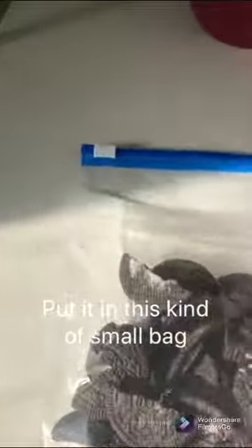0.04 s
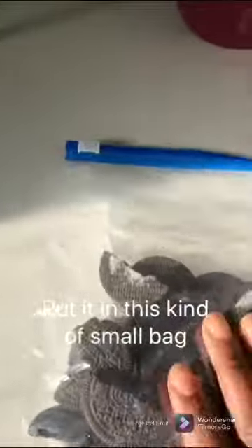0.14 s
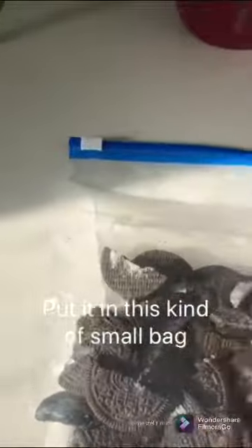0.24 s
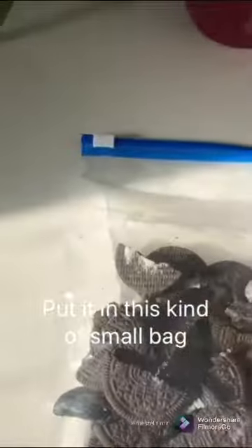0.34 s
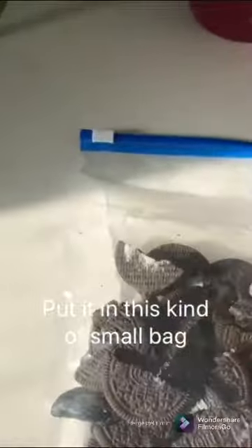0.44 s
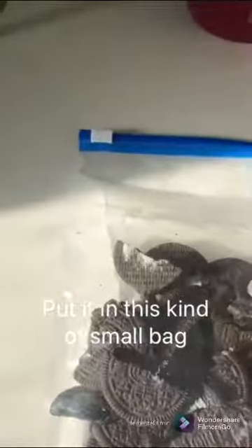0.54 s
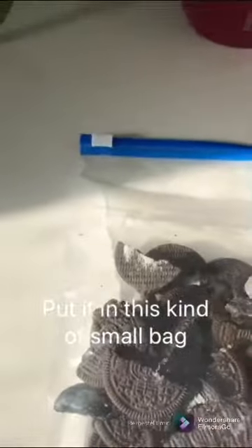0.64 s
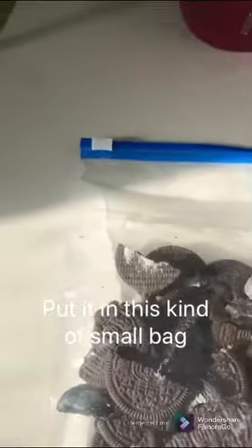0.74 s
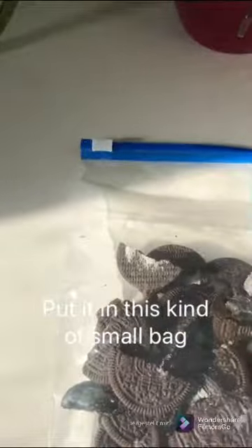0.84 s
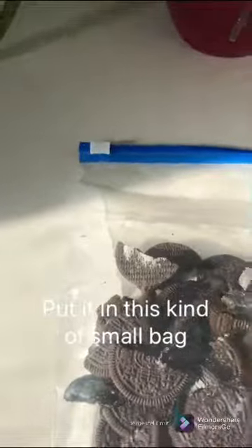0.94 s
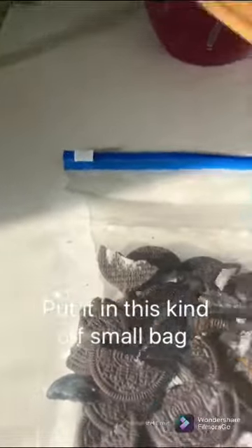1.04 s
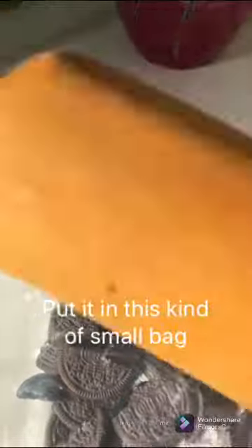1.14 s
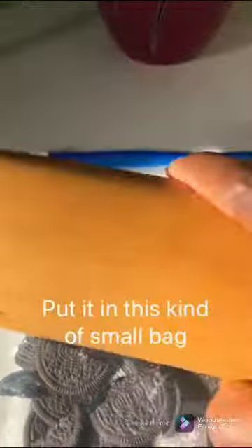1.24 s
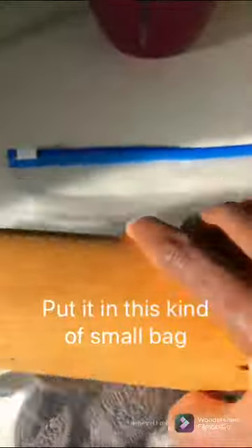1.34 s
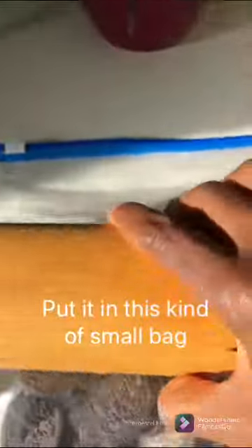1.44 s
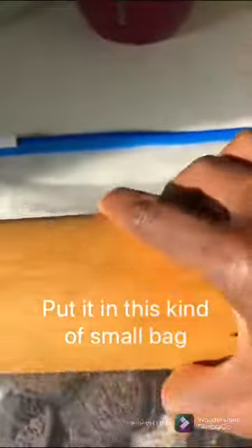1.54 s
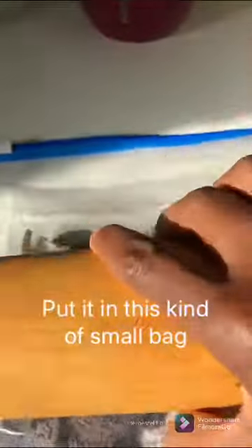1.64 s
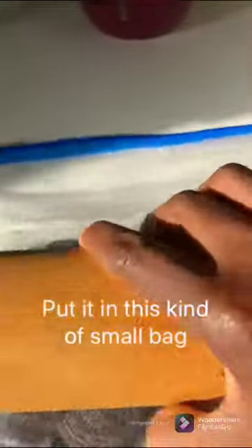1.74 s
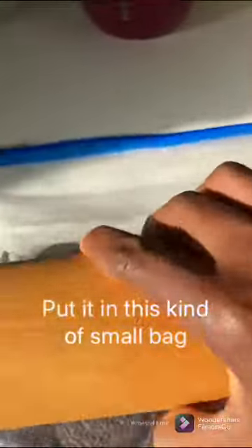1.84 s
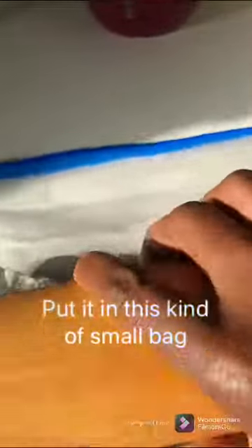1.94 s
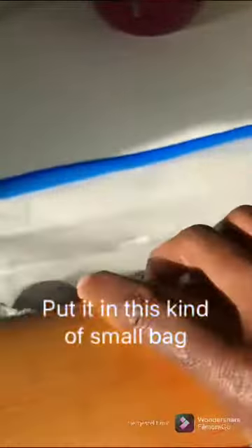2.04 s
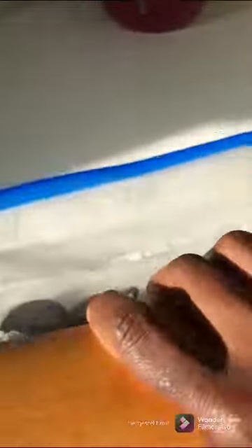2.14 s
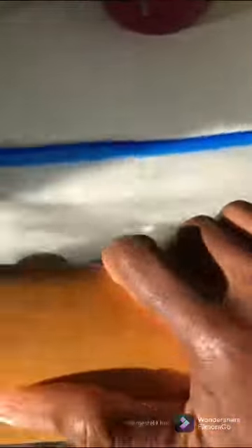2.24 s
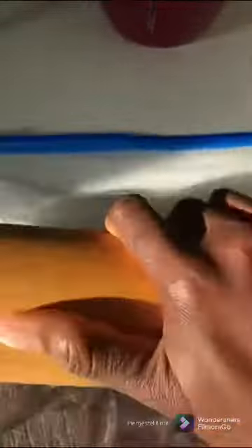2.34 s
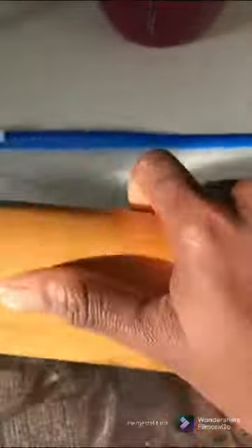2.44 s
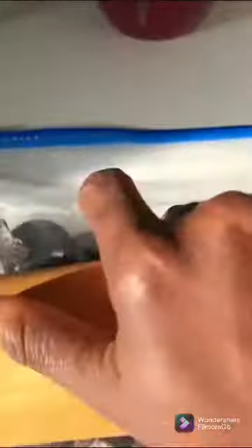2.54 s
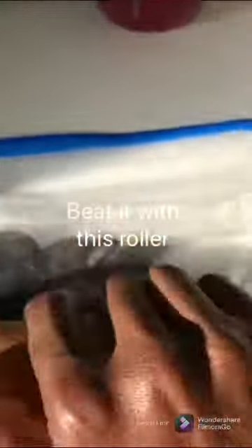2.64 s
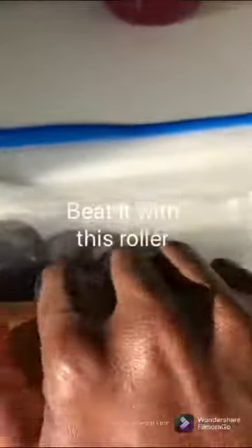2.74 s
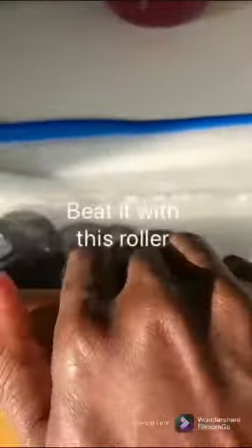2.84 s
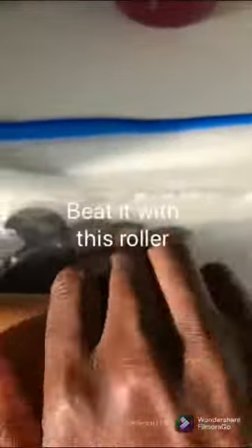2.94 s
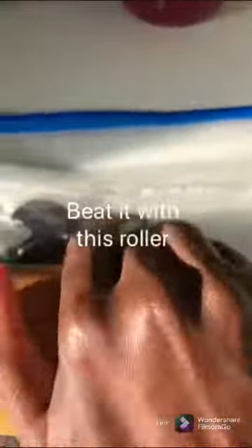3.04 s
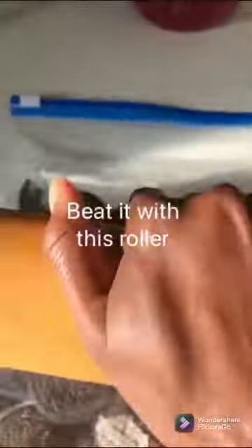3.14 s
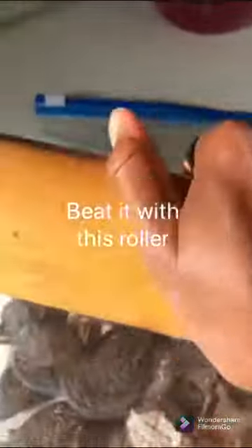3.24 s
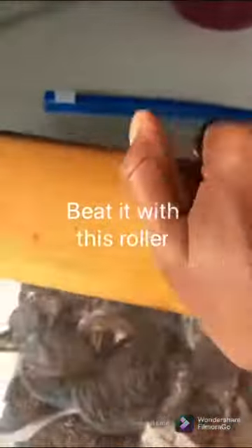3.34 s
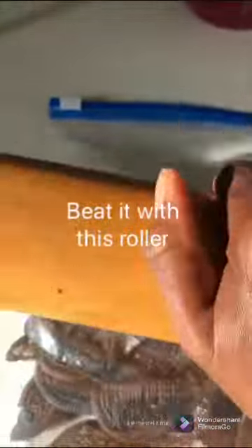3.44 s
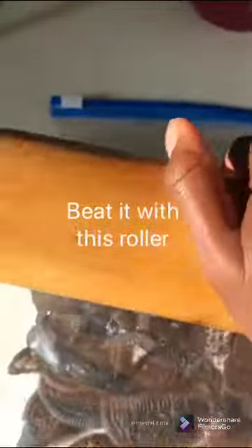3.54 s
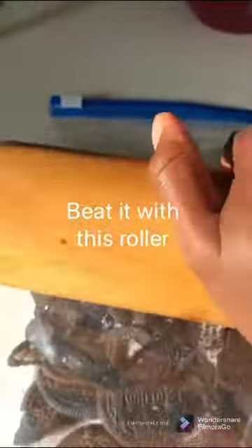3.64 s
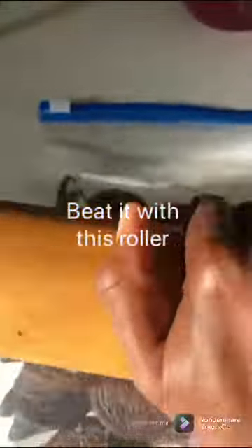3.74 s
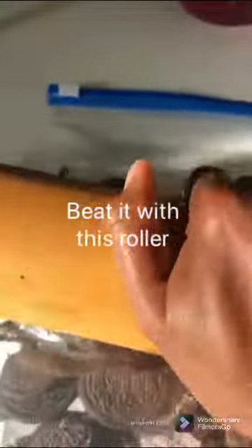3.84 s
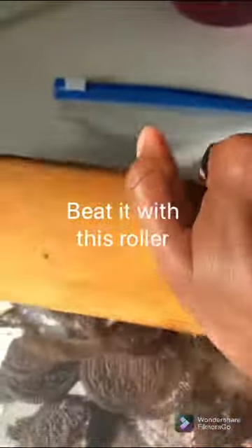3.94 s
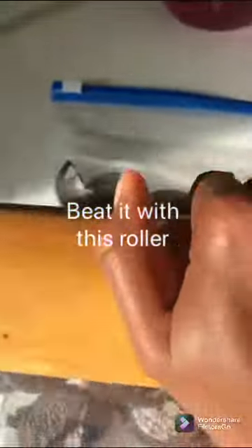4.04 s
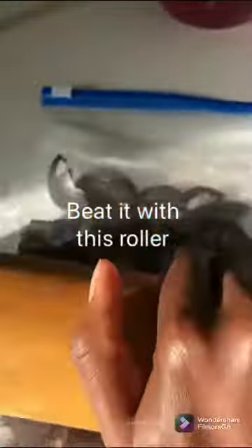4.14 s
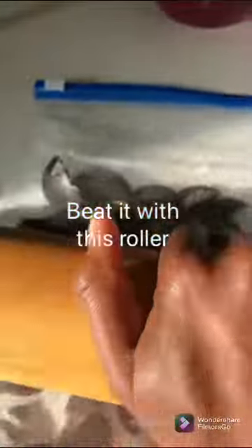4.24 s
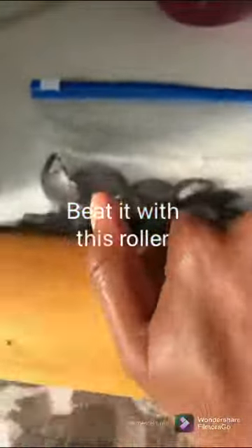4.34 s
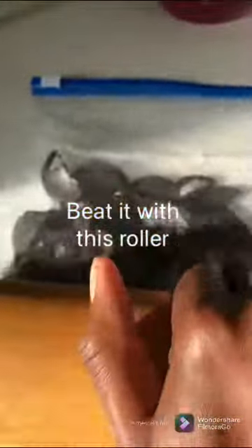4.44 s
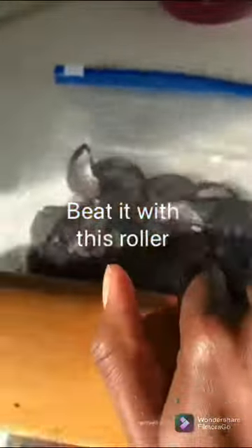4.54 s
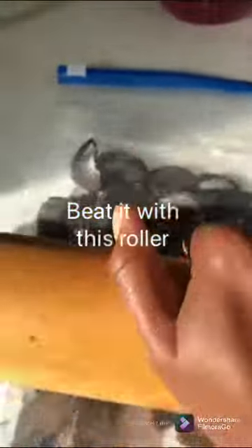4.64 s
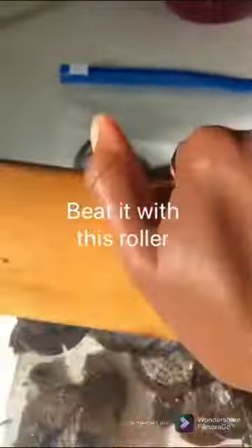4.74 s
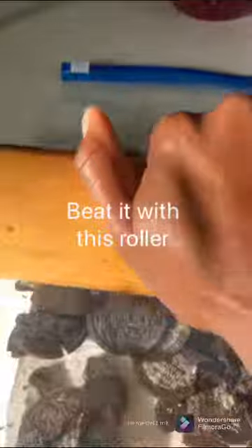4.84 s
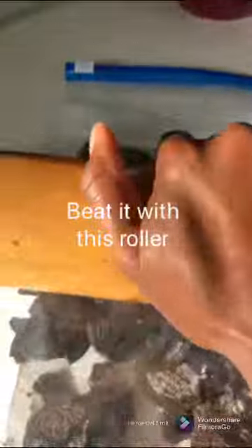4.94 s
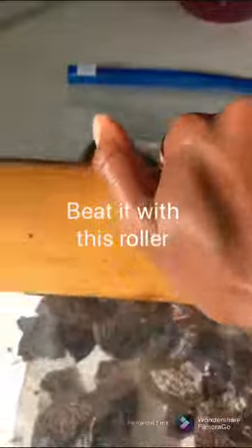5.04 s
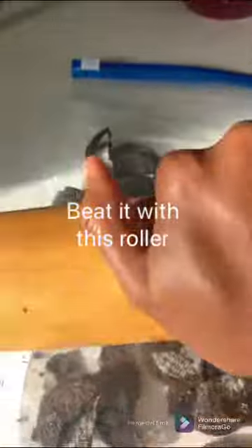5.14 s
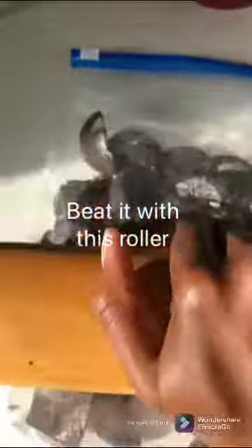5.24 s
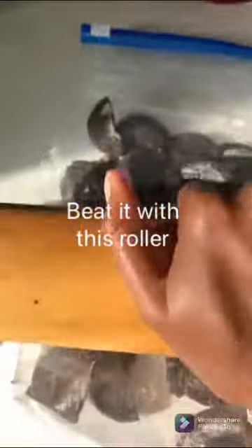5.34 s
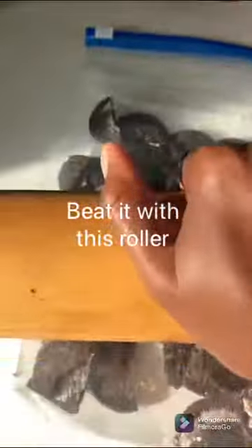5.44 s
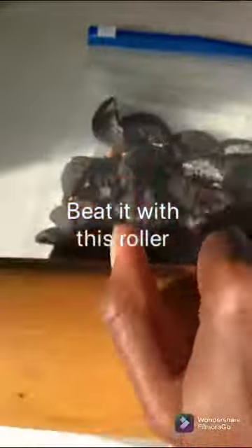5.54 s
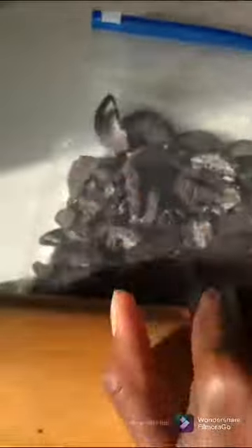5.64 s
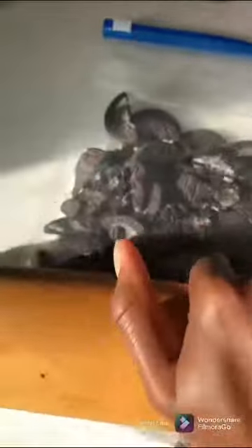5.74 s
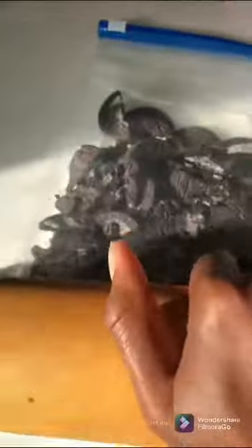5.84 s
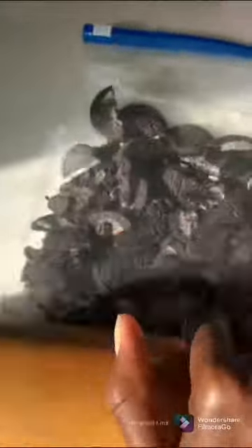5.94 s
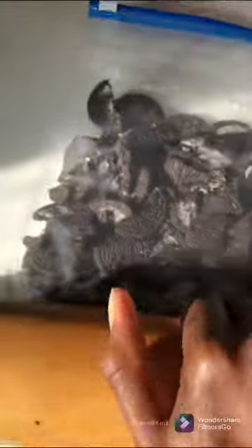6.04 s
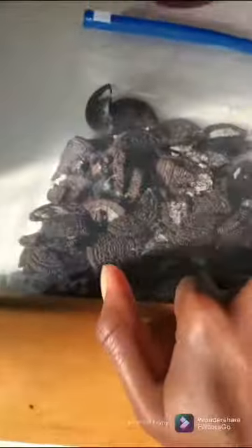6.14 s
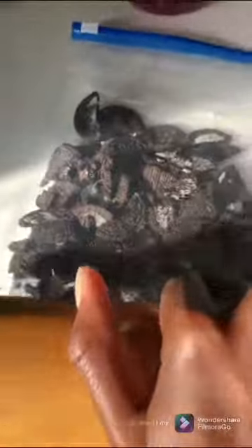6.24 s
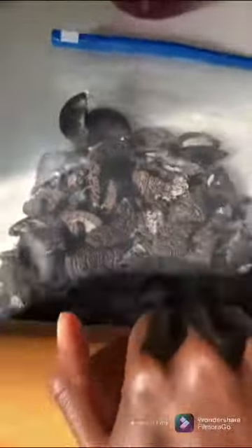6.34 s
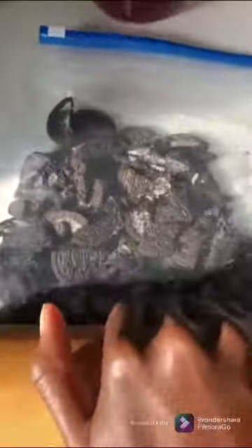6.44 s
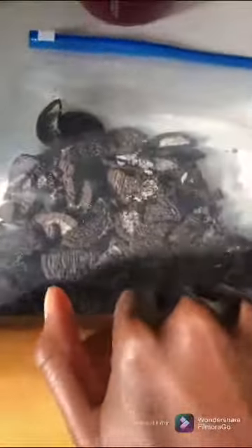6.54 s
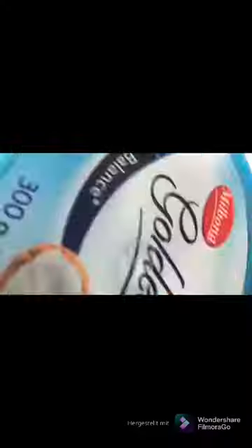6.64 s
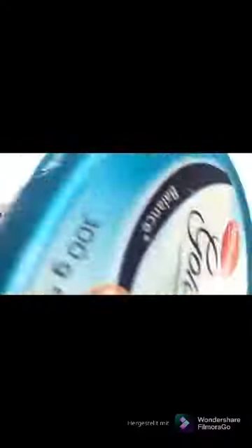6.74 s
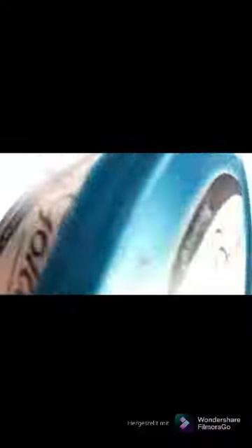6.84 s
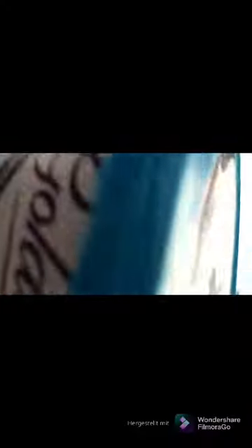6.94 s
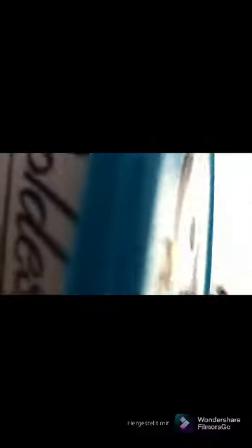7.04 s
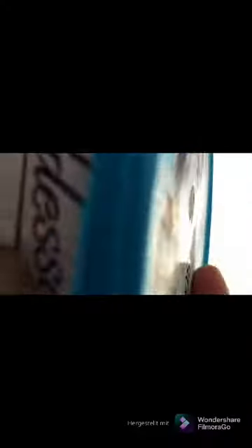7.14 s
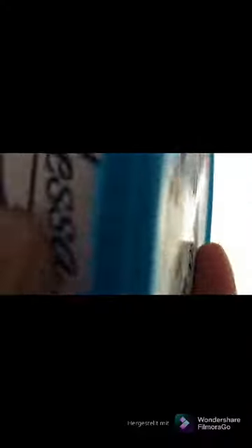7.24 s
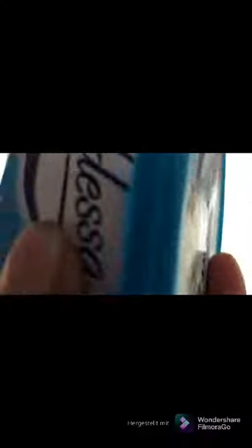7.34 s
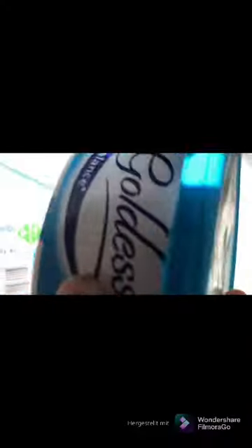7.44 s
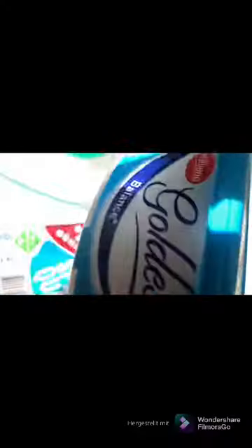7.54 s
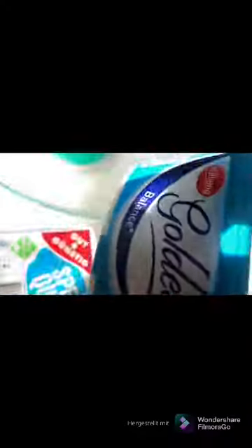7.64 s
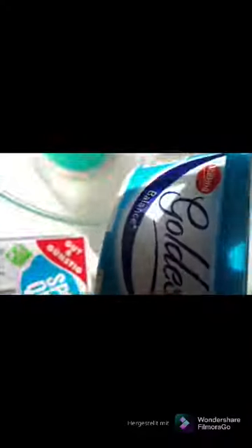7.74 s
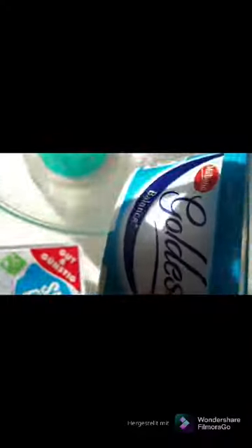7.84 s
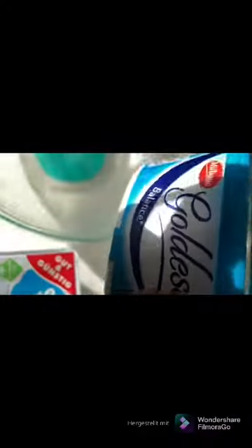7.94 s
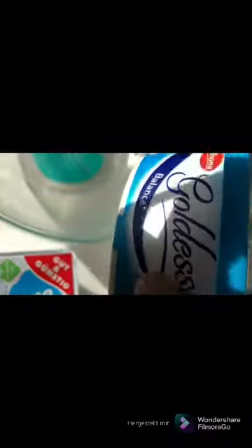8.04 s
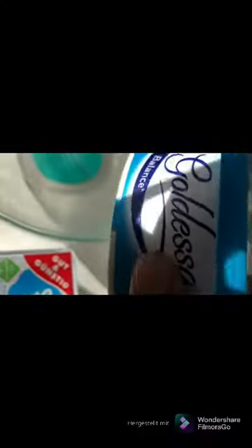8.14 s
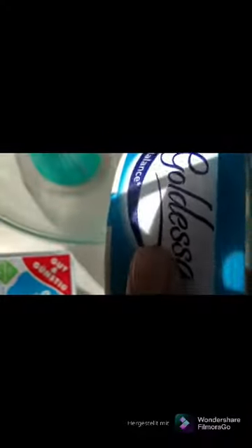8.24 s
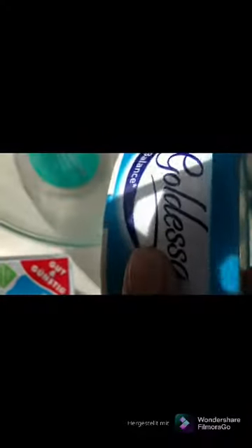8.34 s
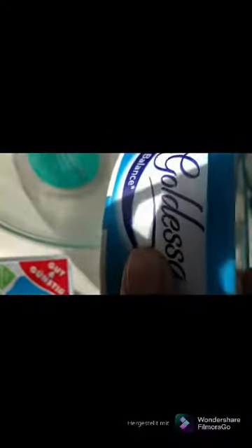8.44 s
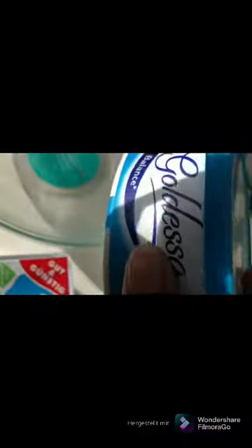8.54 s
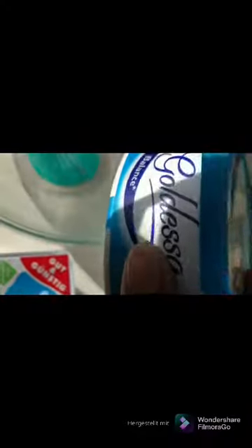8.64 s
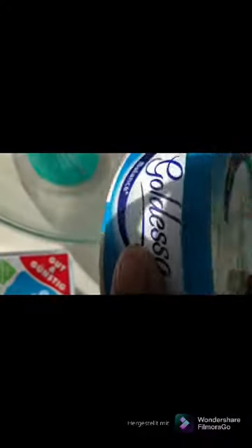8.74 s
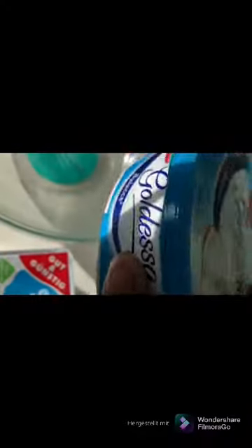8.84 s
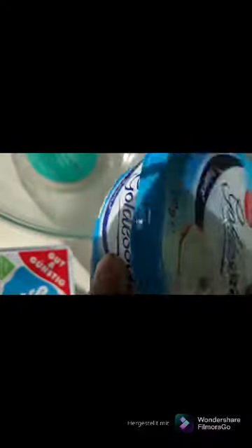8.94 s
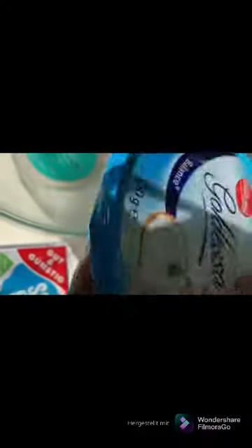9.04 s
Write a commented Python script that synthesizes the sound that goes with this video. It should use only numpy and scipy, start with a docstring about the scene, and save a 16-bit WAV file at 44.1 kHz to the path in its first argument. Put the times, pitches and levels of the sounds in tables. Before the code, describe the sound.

A rolling pin clacks, knocks and thumps on a worktop, crushing bagged biscuits; suddenly quiet, a brief swelling hiss and a light tub click.

```python
"""The tail of a crunch, then a biscuit snaps in a plastic bag; a wooden rolling pin leans on, rolls over and
beats the bag. Each blow snaps biscuits (bursts of tiny clicks), leaves crumbs and film crackling, and booms
in the worktop. The pin knocks on the hard top and clacks in the hand: short taps on decaying sine modes.
Then the scene suddenly changes: a short, gently swelling hiss of shaped noise, and a plastic tub
tapped and brushed by fingers in a quiet room."""
import sys
import numpy as np
from scipy import signal
from scipy.fft import rfft, irfft
from scipy.io import wavfile
from scipy.ndimage import uniform_filter1d

SR = 44100
rng = np.random.default_rng(int(sys.argv[2]) if len(sys.argv) > 2 else 0)


def transcribe(signal):
    """Save signal, clipped to [-1, 1], as a 16-bit WAV file at the path in sys.argv[1]."""
    frames = np.atleast_2d(signal).T
    limited = np.clip(frames, -1, 1)
    pcm = np.round(limited * 32767).astype(np.int16)
    wavfile.write(sys.argv[1], SR, pcm)


N = 400869
T = np.arange(N) / SR
CUT_S, HISS_START_S = 6.65, 6.697  # the crushing ends; the tub scene begins


def undb(db):
    """Turn decibels into gain."""
    return 10 ** (np.asarray(db) / 20)


def unit(x):
    """Scale to rms 1."""
    return x / np.sqrt(np.mean(x ** 2) + 1e-18)


def add(track, s, sound):
    """Mix a sound into the track at time s."""
    i = max(int(s * SR), 0)
    track[i:i + len(sound)] += sound[:N - i]


def between(start_s, end_s):
    """Give 1 from start to end and 0 elsewhere, with edges smoothed over 64 samples."""
    return uniform_filter1d(1. * ((T > start_s) & (T < end_s)), size=64)


def colour(x, points):
    """Filter to a (pitch_hz, level_db) outline, scaled to unit power, with no sound before its cause."""
    hz, db = np.transpose(points)
    grid = np.linspace(1, SR / 2, 2049)
    outline_db = np.interp(np.log(grid), np.log(hz), db)
    # folding the cepstrum makes the filter minimum-phase
    cepstrum = irfft(np.log(undb(outline_db)))
    fold = 1 + np.sign(len(cepstrum) / 2 - np.arange(len(cepstrum)))
    fold[0] = 1
    response = irfft(np.exp(rfft(cepstrum * fold)))
    return signal.oaconvolve(x, response / np.linalg.norm(response))[:len(x)]


def band(x, lo_hz, hi_hz, order=1):
    """Keep the sound between two pitches."""
    top_hz = min(hi_hz, .49 * SR)
    return signal.sosfilt(signal.butter(order, [lo_hz, top_hz], "band", fs=SR, output="sos"), x)


def ring(modes, detune=0.0083, vary_db=2):
    """Tap an object's modes, rms 1 over the first 10 ms; grip and striking point vary pitch and level."""
    t = T[:SR // 4]
    out = np.zeros(len(t))
    for hz, db, t60 in modes:
        level = undb(db + vary_db * rng.standard_normal() - 60 * t / t60)
        actual_hz = hz * (1 + detune * rng.standard_normal())
        out += level * np.sin(2 * np.pi * actual_hz * t) * rng.choice([-1, 1])
    return out / np.std(out[:SR // 100])


def crack(t60):
    """Make a short burst of contact noise that fades by 60 dB in t60 seconds."""
    t = T[:SR // 4]
    return rng.standard_normal(len(t)) * undb(-60 * t / t60)


def soften(x, contact_s):
    """Spread a tap over the time that the contact lasts."""
    push = np.hanning(int(contact_s * SR) + 3)
    return signal.fftconvolve(x, push / push.sum())


def crackle(per_second, spread_db):
    """Scatter tiny fractures at random times, each of its own size and colour; rms 1."""
    at = np.flatnonzero(rng.random(N) < per_second / SR)
    size = undb(spread_db * np.minimum(rng.exponential(size=len(at)), 3.5))
    out = 0
    # separate random strengths in each octave give every click its colour
    for hz in np.geomspace(SR / 256, SR / 4, 7):
        clicks = np.zeros(N)
        clicks[at] = size * rng.standard_normal(len(at))
        out = out + band(clicks, hz, 2 * hz)
    return unit(out)


def walk(per_second):
    """Draw random levels and join them with straight lines; spread near 1."""
    knots_s = np.arange(0, T[-1] + 1, 1 / per_second)
    return np.interp(T, knots_s, rng.standard_normal(len(knots_s)))


SWELL_DB, SWELL_ROUNDNESS = 19, 1.4  # drop over one rise or fall time; 1 = pointed, 2 = bell


def swells(rows):
    """Shape gestures that rise to a peak and fall away, from (peak_s, level_db, rise_s, fall_s) rows."""
    gain = np.zeros(N)
    for s, db, rise, fall in rows:
        near = np.abs(T - s) < 3 * max(rise, fall)
        away = np.maximum((s - T[near]) / rise, (T[near] - s) / fall)
        gain[near] += undb(db - SWELL_DB * away ** SWELL_ROUNDNESS)
    return gain


# colour of the quiet room's air: pitch_hz [Hz], relative level_db [dB per Hz]
ROOM_TONE = [(18, -37), (30, -13), (98, -4.5), (124, -13), (204, -11), (364, -17.5), (486, -12.5),
             (584, -19), (1250, -23.5), (2010, -29.5), (16000, -40.5)]
# appliance hum, before the air level of each scene: pitch_hz [Hz], level_db [dB]
HUM = [(96.9, -74.5), (489.9, -77), (2288, -90), (4980, -93)]
# colour of the hiss: pitch_hz [Hz], relative level_db [dB per Hz]
HISS = [(40, 3), (150, -4.5), (400, -7), (900, -6), (1600, -6.5), (2150, -2), (2560, 5), (3000, -3.5),
        (3800, -11), (4800, -15.5), (8800, -17.5), (9600, -40), (16000, -50)]
ROOM_TONE_DB = -63.5  # before the air level of each scene
AIR_CRUSHING_DB, AIR_TUB_DB = 4, -1  # air and hum together, in each scene
HISS_DB, HISS_SWELL_DB_PER_S = -48.5, 7.5  # level at its start, and how fast it grows
HISS_END_S, HISS_RELEASE_DB_PER_S = 7.385, 950


def beds():
    """Lay down noise for room air, sines for appliance hum, and a swelling hiss that opens the tub scene."""
    hum = sum(undb(db) * np.sqrt(2) * np.sin(2 * np.pi * hz * T) for hz, db in HUM)
    air = undb(ROOM_TONE_DB) * colour(rng.standard_normal(N), ROOM_TONE) + hum
    air_db = np.where(T < CUT_S, AIR_CRUSHING_DB, AIR_TUB_DB)
    release_db = HISS_RELEASE_DB_PER_S * np.maximum(T - HISS_END_S, 0)
    swell_db = HISS_SWELL_DB_PER_S * (T - HISS_START_S) - release_db
    hiss = undb(HISS_DB + swell_db) * colour(rng.standard_normal(N), HISS)
    return air * undb(air_db) + hiss * (T > HISS_START_S)


# kitchen reverberation: pitch_hz [Hz], t60_s [s to fade 60 dB], level_db [dB re direct, before wet_db]
KITCHEN = [(100, 0.49, -10), (201, 0.74, -13.5), (417.6, 0.2, -3.5), (1020, 0.31, -12), (3030, 0.23, -10),
           (7050, 0.54, -19.5), (14000, .2, -12.5)]


def kitchen(x, wet_db=0, gap_s=0.0057):
    """Add a diffuse tail off walls and cupboards, with its own fading time in each octave."""
    hz, t60, db = np.transpose(KITCHEN)
    t, tail = T[:SR * 2 // 3], 0
    for lo in np.geomspace(SR / 640, SR / 2.5, 9):
        middle = np.log(lo * np.sqrt(2))
        decay_s = np.interp(middle, np.log(hz), t60)
        level_db = np.interp(middle, np.log(hz), db)
        noise = rng.standard_normal(len(t)) * undb(-60 * t / decay_s) * (t > gap_s)
        part = band(noise, lo, 2 * lo, order=3)
        # each octave gets power in proportion to its width
        share = np.sqrt(2 * min(lo, SR / 2 - lo) / SR)
        tail = tail + undb(level_db) * part / np.linalg.norm(part) * share
    return x + undb(wet_db) * signal.oaconvolve(x, tail)[:N]


# fingers sliding on the tub: peak_s [s], level_db [dB], rise_s [s], fall_s [s]
TUB_RUBS = [(7.98, -71, 0.24, .1), (8.58, -72, .2, 0.33)]


def rubs(lo_hz=1000, hi_hz=5500):
    """Brush the tub faintly with fingers as it is turned: dense tiny clicks that swell and fade."""
    return swells(TUB_RUBS) * unit(band(crackle(3000, 1.5), lo_hz, hi_hz))


# taps on the tub: start_s [s], level_db [dB, before a 4 dB cut and softening], contact_s [s]
TUB_TAPS = [(6.853, -41, .0006), (7.545, -60, .00005), (7.826, -39, 0.00043), (8.0319, -21, .00002)]
# notes of the thin plastic tub: pitch_hz [Hz], relative level_db [dB], t60_s [s to fade 60 dB]
TUB_MODES = [(168.4, -10, 0.034), (522, -2, 0.018), (751, -1, 0.017), (906, 0.5, 0.022), (1455, -2, 0.006),
             (2623, 3.5, 0.0023)]


def tub(tick_db=9, rattle_db=-8, lowest_hz=200):
    """Nudge a thin plastic tub, then click it sharply; everything below 200 Hz is thinned out."""
    out = np.zeros(N)
    for s, db, contact_s in TUB_TAPS:
        tick = undb(tick_db) * crack(0.034) + undb(rattle_db) * crack(0.1)
        tick = band(tick, 3980, 8100, order=2)
        scrape = undb(1.5) * band(crack(0.022), 600, 14000)
        tap = ring(TUB_MODES, vary_db=1.5) + tick + scrape
        add(out, s, undb(db - 4.0) * soften(tap, contact_s))
    return band(out, lowest_hz, 15800)


# the pin comes down on the bag: landing_s [s, its weight lands], crush_s [s of crushing before that],
# crunch_db [dB], settle_db [dB, settling crumbs], low_db and upper_db [dB, worktop modes, before thump_db]
BLOWS = [(0.201, 0.0064, -16, -46, -28.5, -29), (1.433, 0.021, -33.5, -47, -16.5, -23.5),
         (1.778, 0.029, -26.5, -36.5, -19, -36.5), (1.802, 0.008, -35, -35, -36.5, -25),
         (2.283, 0.013, -25.5, -37, -22.5, -13), (2.738, 0.032, -27, -31.5, -17.5, -12.5),
         (3.473, .032, -27.5, -29.5, -19.5, -12.5), (3.83, 0.026, -20.5, -30.5, -21.5, -13),
         (4.205, .025, -25, -29, -12, -31), (4.558, 0.02, -21, -28, -16.5, -18),
         (4.947, 0.014, -29.5, -45, -12.5, -21.5), (5.315, 0.039, -34.5, -26, -13.5, -19.5),
         (5.68, 0.017, -15, -31, -23.5, -13.5), (6.035, 0.02, -17, -29.5, -13, -20),
         (6.421, .008, -30.5, -32.5, -12.5, -12.5)]
# the slab's two modes: pitch_hz [Hz], t60_s [s], then the room's low end ringing on:
# after_hz [Hz], after_db [dB re the mode], after_t60_s [s]
WORKTOP = [(96, 0.15, 110, -19.5, 0.39), (191, 0.11, 194, -17, .36)]
# colour of the worktop when shaken: pitch_hz [Hz], relative level_db [dB]
SHAKE_COLOUR = [(40, -28.5), (75, -7.5), (100, 4), (130, 5.5), (160, -4.5), (195, 4.5), (250, -13.5),
                (330, -20), (700, -22), (1200, -32.5), (3000, -56.5)]
# soft bumps as the bag is nudged and the pin rides over pieces: start_s [s], level_db [dB]
BUMPS = [(0.463, -36), (0.56, -46), (0.645, -57), (0.747, -43), (0.875, -47.5), (1.23, -43.5), (2.095, -37),
         (2.175, -36), (3.042, -35.5)]
# bag and pin rolling over the worktop: peak_s [s], level_db [dB, before rumble_db], rise_s [s], fall_s [s]
ROLLS = [(0.72, -48.5, 0.29, .27), (1.25, -49.5, .04, .03), (2.25, -31, 0.27, 0.049),
         (2.69, -35.5, 0.093, .04), (3.06, -38, 0.047, 0.2)]


def worktop(thump_db=9, thud_db=-7, rumble_db=2, bump_db=0, give_s=0.0092, load=.06):
    """Boom in the slab's two modes, built up gradually through the biscuit; rolling shakes them gently."""
    out, t = np.zeros(N), T[:SR // 2]
    build = 1 - np.exp(-(t / give_s) ** 2)
    landings = [(s, (low_db, upper_db)) for s, *_, low_db, upper_db in BLOWS]
    for s, levels in landings:
        for (hz, t60, after_hz, after_db, after_t60), db in zip(WORKTOP, levels):
            # the pitch settles as the pin's load comes off; the room's low end rings on
            bend = np.cumsum(1 + load * rng.standard_normal() * np.exp(-t / 0.024)) / SR
            boom = undb(-60 * t / t60) * np.sin(2 * np.pi * hz * bend)
            after = undb(after_db - 60 * t / after_t60) * np.sin(2 * np.pi * after_hz * bend)
            add(out, s, -undb(db + thump_db) * build * (boom + after))
    shake = colour(rng.standard_normal(N), SHAKE_COLOUR)
    # pieces collapsing under a blow jolt the slab unevenly, as the soft bumps do
    jolts = [(s, max(levels) + thud_db) for s, levels in landings]
    jolts += [(s, db + bump_db) for s, db in BUMPS]
    for s, db in jolts:
        near = slice(int(s * SR), int(s * SR) + SR // 20)
        out[near] += undb(db) * unit(shake[near] * np.hanning(SR // 20))
    return out + undb(rumble_db) * shake * swells(ROLLS)


# the pin striking through to the hard top: start_s [s], level_db [dB, before knock_db],
# tilt_db [dB per octave, below 1000 Hz only]
KNOCKS = [(1.412, -14.5, 3), (1.766, -11, 9.5), (1.772, -13.5, 1.5), (1.803, -19, -2), (2.281, -13.5, -11),
          (2.292, -23, -9.5), (3.444, -21, 2), (3.479, -13, 1), (3.487, -16.5, -13.5), (3.753, -42, -12),
          (3.828, -21.5, 17.5), (4.192, -20, 6.5), (5.308, -22.5, 2), (5.672, -17, 8), (5.681, -29, -0.5)]
# notes of the pin on the hard top: pitch_hz [Hz], relative level_db [dB], t60_s [s to fade 60 dB]
KNOCK_MODES = [(340, -10, .1), (406.2, -9, 0.2), (480.8, -9, 0.1), (604, -4.5, .09), (730, 2, .09),
               (984, 4, .07), (1110, -0.5, 0.027), (1300, -2, 0.023), (1514, -11.5, 0.025),
               (1970, -31.5, .04)]
# the pin clacking in the hand: start_s [s], level_db [dB, before clack_db],
# bright_db [dB, treble re middle, before treble_db]
CLACKS = [(1.009, -33, -33), (1.213, -30, -7.5), (1.221, -23, -13.5), (1.281, -24.5, -8.5),
          (1.617, -13, -9), (1.633, -21, -9.5), (1.873, -10, -3.5), (1.889, -20, -17),
          (2.109, -18.5, -14.5), (2.156, -18.5, -6), (2.508, -18.5, -19), (2.821, -21, -22),
          (3.086, -19.5, -8.5), (3.207, -17.5, -16.5), (3.527, -14.5, -0.5), (3.567, -21, -26.5),
          (3.658, -26, -21.5), (3.699, -25, -27.5), (3.977, -24.5, -16), (4.003, -13.5, -5),
          (4.044, -22.5, -11.5), (4.06, -21, -19), (4.306, -20.5, -19), (4.485, -21.5, -21),
          (4.794, -30, 3), (4.836, -32, -14), (4.908, -18, -24), (5.024, -17.5, -9.5), (5.223, -23, -21.5),
          (5.384, -23, -17.5), (5.471, -27.5, -6), (5.639, -19, -11.5), (5.805, -19, -36),
          (6.252, -25, -24), (6.548, -14.5, -20), (6.561, -23.5, -8)]
# notes of the pin in the hand: pitch_hz [Hz], relative level_db [dB], t60_s [s to fade 60 dB]
CLACK_MODES = [(380, -9, 0.013), (600, -7, 0.0059), (850, -10, 0.0094), (1006, 2, 0.02),
               (1380, -2.5, 0.034), (1650, -7, 0.0063), (2420, 0, 0.012), (2850, -15.5, .008),
               (3385, -8.5, 0.017), (4240, -8, 0.014), (6500, -15.5, 0.0028)]
# bright ping after one hard snap: pitch_hz [Hz], relative level_db [dB], t60_s [s to fade 60 dB]
PING_MODES = [(3460, 1, .06), (4340, 9.5, .06), (5080, -4.5, .05), (5950, 4, 0.059), (6750, -5.5, 0.03),
              (8730, -13, 0.14), (9000, -5, .1)]
PING_S, PING_DB = 1.804, -19.5


def pin(knock_db=-1, clack_db=-12, treble_db=5, grit_db=-5, scuff_db=8, bounce_s=.004, bounce_db=-4):
    """Ring the wood: hollow knocks when it hits bottom, rattling clacks as the hand lifts and turns it."""
    out = np.zeros(N)
    for s, db, tilt_db in KNOCKS:
        modes = [(hz, mode_db + tilt_db * np.log2(min(hz / 1000, 1)), t60)
                 for hz, mode_db, t60 in KNOCK_MODES]
        thud = band(crack(0.14), 450, 1300, order=2)
        grit = undb(grit_db) * thud / np.std(thud[:SR // 100])
        add(out, s, undb(db + knock_db) * (ring(modes) + grit))
    for s, db, bright_db in CLACKS:
        modes = [(hz, mode_db + (bright_db + treble_db) * (hz > 2000), t60)
                 for hz, mode_db, t60 in CLACK_MODES]
        scuff = undb(scuff_db + bright_db / 2) * band(crack(0.012), 700, 4400, order=2)
        # two contacts each: the second is later and weaker
        for k, uneven in enumerate(rng.uniform(0.31, 1.4, size=2)):
            wood = ring(modes, detune=.05, vary_db=3)
            start_s = s + k * bounce_s * uneven
            add(out, start_s, undb(db + clack_db + k * bounce_db) * (wood + scuff))
    add(out, PING_S, undb(PING_DB) * ring(PING_MODES, detune=0))
    return band(out, 220, 18000)


# rings of the pin that colour every crack: pitch_hz [Hz], width_hz [Hz], level_db [dB, before ring_db]
PIN_RINGS = [(976, 50, -4.5), (3720, 61, -6.5), (4300, 250, -3.5)]


def through_pin(x, ring_db):
    """Let cracks under the pin set its wood ringing in a few narrow bands; rms 1."""
    rings = sum(undb(db + ring_db) * band(x, hz - width / 2, hz + width / 2) for hz, width, db in PIN_RINGS)
    return unit(x + rings)


# the tail of a crunch already under way at the start, then the bag rustling as it is pushed or
# springs back: peak_s [s], level_db [dB], rise_s [s], fall_s [s]
RUSTLES = [(0.008, -32.5, 0.024, 0.039), (0.47, -55, .02, 0.73), (0.885, -35.5, .04, 0.053),
           (1.15, -63, 0.11, 0.11), (1.72, -34, .08, 0.26), (2.085, -31.5, .1, 0.063),
           (2.25, -32.5, .11, 0.18), (2.45, -36, .08, .1), (2.624, -26.5, 0.027, 0.11),
           (3.1, -34, 0.13, 0.19), (3.97, -39.5, .1, 0.075), (5.11, -42, 0.11, 0.2),
           (5.88, -39, 0.071, .05), (6.22, -45.5, .05, 0.12), (6.635, -32, 0.04, .05)]
# at every blow the crunch sets in at once and dies fast, then the crumbs settle slowly
CRUNCH_RISE_DB_PER_S, CRUNCH_FALL_DB_PER_S, SETTLE_DB_PER_S = 2201, 381, 89


def stirring():
    """Say how hard the crumbs move: an opening crunch tail, a crunch and settling at every blow, rustles."""
    power = swells(RUSTLES) ** 2
    for s, crush_s, crunch_db, settle_db, *_ in BLOWS:
        near = np.abs(T - s) < 1
        age = T[near] - (s - crush_s)
        before, after = np.maximum(-age, 0), np.maximum(age, 0)
        crunch = crunch_db - CRUNCH_FALL_DB_PER_S * after
        settle = settle_db - SETTLE_DB_PER_S * after
        db = np.maximum(crunch, settle)
        power[near] += undb(db - CRUNCH_RISE_DB_PER_S * before) ** 2
    return np.sqrt(power)


# colour of crumbs grinding: pitch_hz [Hz], relative level_db [dB]
CRUMB_COLOUR = [(150, -13.5), (500, -6), (1200, 5), (2500, 1), (4500, -6), (8000, -14), (16000, -29)]
# colour of the bag's film: pitch_hz [Hz], relative level_db [dB]
FILM_COLOUR = [(150, -2.5), (400, -2.5), (700, 1.5), (1100, 3.5), (1700, -2.5), (3000, -10), (6000, -4),
               (9000, -9), (12000, -19), (16000, -30)]


def crumbs(grind_db=-6, film_db=-7, ticks_db=-14, tumble_s=.014):
    """Grind and tumble coarse crumbs in small slides; the film rustles finely and its creases tick."""
    slides = undb(5.5 * walk(70) - 2)
    tumbling = signal.oaconvolve(crackle(400, 2.0), crack(tumble_s))[:N]
    grind = through_pin(colour(tumbling, CRUMB_COLOUR), ring_db=-10.0)
    rustle = undb(film_db) * crackle(6000, 2.)
    ticks = undb(ticks_db) * crackle(150, 2.5)
    film = colour(rustle + ticks, FILM_COLOUR)
    return stirring() * slides * (undb(grind_db) * grind + film)


# the loudest biscuits snapping: peak_s [s], level_db [dB], swell_s [s, time scale of the burst],
# bright_db [dB, boost of the part above split_hz]
SNAPS = [(0.196, -11.5, 0.004, 4.5), (0.281, -24, 0.00053, 23), (1.425, -9, 0.0028, 6.5),
         (1.717, -29.5, 0.0049, -12.5), (1.775, -15, 0.0017, 3), (1.807, -22, .0047, 14),
         (2.094, -27.5, .011, -16.5), (2.23, -23.5, 0.0033, -4.5), (2.726, -13.5, .008, -0.5),
         (2.733, -10, 0.0011, 8), (2.909, -29, 0.0016, -15), (2.938, -34.5, .0006, 10),
         (2.962, -35, 0.0012, 14), (3.447, -15, 0.0039, 0), (3.461, -12.5, 0.0016, -2),
         (3.827, -8.5, 0.0022, 0), (4.187, -22, 0.0052, 5.5), (4.193, -8.5, 0.0033, -6.5),
         (4.209, -11, 0.0021, -13), (4.547, -16, 0.0044, 8.5), (4.552, -11, 0.0047, -6),
         (4.941, -10.5, .005, 1.5), (5.288, -18.5, 0.0043, 8), (5.308, -11.5, 0.0074, -4),
         (5.36, -22.5, .002, -25.5), (5.674, -15.5, 0.0065, -10.5), (5.718, -26.5, 0.0055, -25.5),
         (5.821, -28.5, 0.0021, -3.5), (5.955, -25.5, 0.0011, 19), (6.031, -17, 0.0067, -7.5),
         (6.056, -12, 0.0012, -22.5), (6.089, -28.5, 0.0039, -15), (6.255, -27.5, 0.0017, 12),
         (6.402, -19.5, 0.0018, 12), (6.418, -13.5, 0.0055, 5), (6.438, -14, 0.0045, -21.5)]
# colour of breaking biscuit: pitch_hz [Hz], relative level_db [dB]
SNAP_COLOUR = [(150, -5), (400, -5.5), (700, -2), (1100, 2.5), (1550, 1.5), (2200, -3), (4300, -6.5),
               (6000, -7.5), (8500, -14), (11000, -18.5), (16000, -38.5)]


def snaps(gain_db=0, rise=.9, fall=1.105, split_hz=3200, shard_db=0, shard_width=0.087):
    """Break biscuits: each an avalanche of fractures that starts abruptly and dies within milliseconds."""
    grains = through_pin(colour(crackle(3800, 3.3), SNAP_COLOUR), ring_db=0.0)
    dull = band(grains, 20, split_hz)
    bright = grains - dull
    out = np.zeros(N)
    for s, db, swell, bright_db in SNAPS:
        near = slice(int((s - 6 * swell) * SR), int((s + 14 * swell) * SR))
        age = (T[near] - s) / swell
        shape = np.exp(-np.where(age < 0, np.abs(age / rise) ** 3, age / fall) / 2)
        burst = shape * (dull[near] + undb(bright_db) * bright[near])
        # every shard rings briefly at pitches of its own
        shard_hz = 1200 * 2 ** rng.uniform(0, 2.8, size=4)
        shards = sum(band(burst, hz, hz * (1 + shard_width)) for hz in shard_hz)
        snap = unit(burst + undb(shard_db) * shards)
        out[near] += undb(db + gain_db) * snap * np.sqrt(np.mean(shape ** 2))
    return out


def scene():
    """Stop the crushing dead; after a blink of silence comes the tub scene."""
    crushing = kitchen(snaps() + crumbs() + worktop() + pin()) * between(-1, CUT_S)
    tub_sounds = kitchen(tub() + rubs(), wet_db=-7.0)
    background = beds() * (1 - between(CUT_S, HISS_START_S))
    return (crushing + tub_sounds + background)[None]


TOP_HZ = 16000  # highest pitch kept


def record(dry):
    """Pick up as a phone does: drop the deepest bass, round the loudest peaks and cut the top."""
    dry = signal.sosfilt(signal.butter(2, 36, "high", fs=SR, output="sos"), dry)
    rounded = .95 * dry / (1 + dry ** 4) ** (1 / 4)
    return signal.sosfilt(signal.ellip(8, .2, 70, TOP_HZ, fs=SR, output="sos"), rounded)


dry = scene()
out = record(dry)
transcribe(out)
```